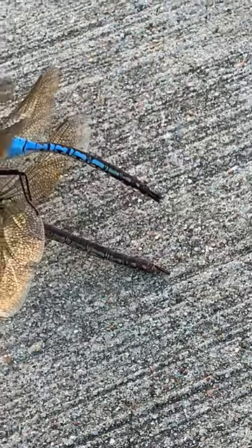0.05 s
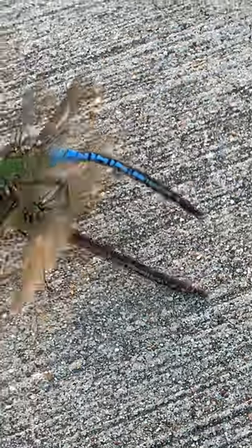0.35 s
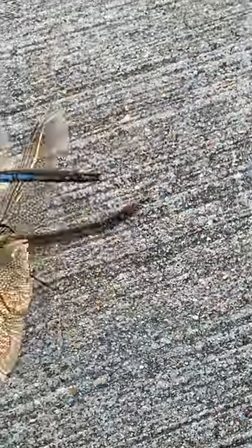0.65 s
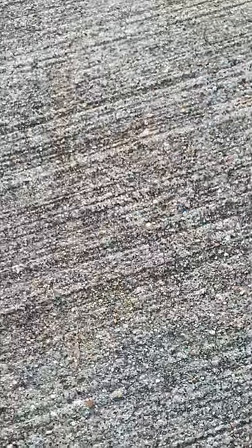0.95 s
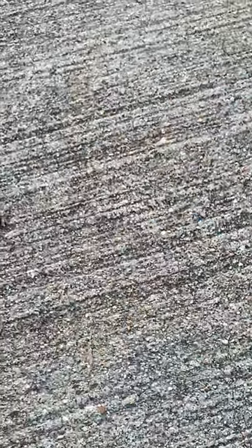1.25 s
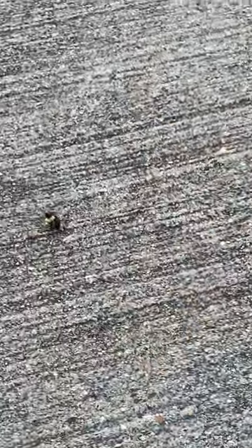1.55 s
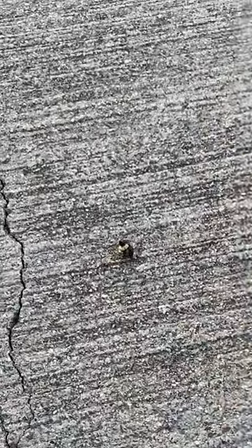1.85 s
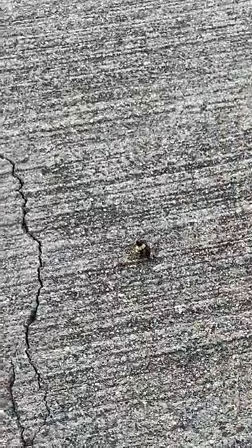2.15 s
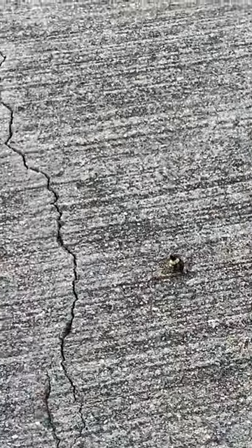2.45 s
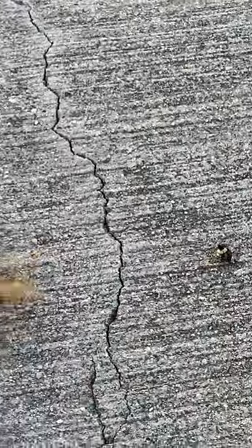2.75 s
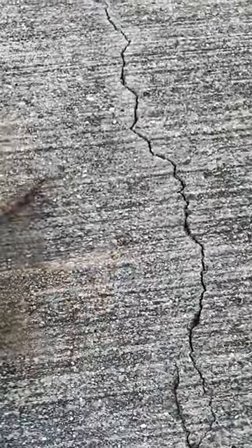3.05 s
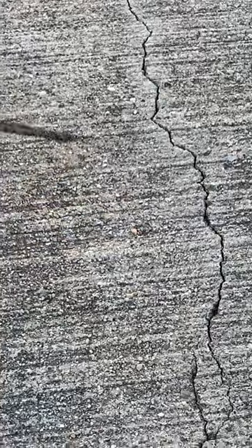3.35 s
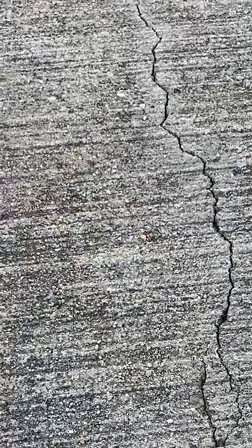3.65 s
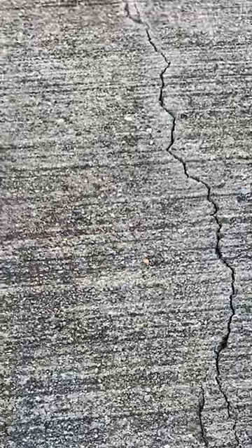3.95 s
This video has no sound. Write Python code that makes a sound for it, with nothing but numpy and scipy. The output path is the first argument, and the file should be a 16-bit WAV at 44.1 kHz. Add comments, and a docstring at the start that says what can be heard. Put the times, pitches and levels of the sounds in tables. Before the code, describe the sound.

Dragonfly wings flutter with a dry, papery rustle and ticks against concrete, over low outdoor rumble.

```python
"""A low outdoor rumble and a hum, then a dry, papery rustle: two tangled dragonflies struggle on
rough concrete, close to a phone's two microphone ports. Their beating wings push the air in a low
flutter, rustle by friction and tick against each other and the ground; their bodies knock on it.
Behind them, distant traffic swells and fades over a faint drone."""
import sys
import numpy as np
from scipy import signal
from scipy.fft import rfft, irfft
from scipy.io import wavfile
from scipy.ndimage import uniform_filter1d

SR = 44100
rng = np.random.default_rng(int(sys.argv[2]) if len(sys.argv) > 2 else 0)


def materialize(psi):
    """Save the field psi as 16-bit PCM at rate SR to the path in sys.argv[1].

    A 1-D psi becomes a single channel; in a 2-D psi each row is a channel.
    """
    bounded = np.clip(np.atleast_2d(psi).T, -1, 1)
    quanta = np.round(bounded * 32767).astype(np.int16)
    wavfile.write(sys.argv[1], SR, quanta)


N = 176400

# wingbeat: (time [s], beat rate [Hz], level of harmonic 1 [dB], of harmonic 2 [dB], of harmonic 3 [dB])
WINGBEAT = [(0, 35.74, -44, -70, -50), (.48, 37, -37, -62, -50), (.62, 41.2, -34, -36.5, -35.5),
            (.8, 43.42, -29.5, -32, -28), (1.1, 46.72, -30, -33, -36.5), (1.38, 49.76, -24.5, -34.5, -45),
            (1.9, 45.7, -33, -34, -34), (2.15, 45.26, -39, -41, -37.5), (2.48, 44.32, -35, -51, -41.5),
            (2.75, 41.54, -27.5, -50, -41), (3.07, 37.13, -30.5, -38, -66), (3.25, 34.23, -41, -47, -42.5),
            (3.47, 31.77, -32, -26.5, -43), (3.65, 31.69, -67, -52, -40.5)]
# spectrum of wing contact: (frequency [Hz], relative level [dB])
WING_SPECTRUM = [(600, -34), (1500, -6.5), (3000, -3), (4600, -0.5), (6500, 3), (8300, 3), (11000, 5.5),
                 (13500, 1.5), (15000, 6), (15700, -1.5), (16400, -30)]
FLEX_BAND_HZ = 1500  # the membranes bend, so colour varies from touch to touch in bands this far apart


def undb(db):
    """Decibels to amplitude ratio."""
    return 10 ** (np.asarray(db) / 20)


def unit(x):
    """Normalisation to rms 1."""
    return x / np.sqrt(np.mean(x ** 2))


def curve(table, column=1):
    """Linear interpolation of one column of a time table, sample by sample."""
    rows = np.array(table, float)
    return np.interp(np.arange(N) / SR, rows[:, 0], rows[:, column])


def response(points):
    """Magnitude response at every bin from (frequency [Hz], level [dB]) points."""
    hz, db = np.array(points, float).T
    bin_hz = np.arange(N // 2 + 1) * SR / N
    return undb(np.interp(np.log(bin_hz + 1), np.log(hz), db))


def colour(x, points):
    """Minimum-phase filtering that keeps the power of white noise."""
    cepstrum = irfft(np.log(unit(response(points))), N)
    cepstrum[1:N // 2] *= 2
    cepstrum[N // 2 + 1:] = 0
    return irfft(rfft(x) * np.exp(rfft(cepstrum)), N)


def drift(rate_hz):
    """Low-pass noise: smooth random motion of rms 1."""
    hold = max(int(SR / rate_hz), 2)
    steps = np.repeat(rng.standard_normal(N // hold + 1), hold)
    return unit(uniform_filter1d(uniform_filter1d(steps, hold), hold)[:N])


def resonance(hz, width_hz):
    """Narrow-band noise: a tone whose amplitude and phase drift."""
    angle = 2 * np.pi * hz * np.arange(N) / SR
    return drift(width_hz) * np.cos(angle) + drift(width_hz) * np.sin(angle)


def distant_noise(spectrum):
    """Partial coherence: far-off noise is alike at both ports in the bass; its mids lean to the right."""
    # incoherent share: (frequency [Hz], side minus mid [dB])
    side_share = [(30, -37), (120, -24), (600, -13), (1400, -9), (3000, -2), (6000, -12)]
    # balance of the ports: (frequency [Hz], left minus right [dB])
    balance = [(50, 0), (260, -2), (550, -4.5), (850, -5), (1300, -1), (2500, 0)]
    mid, side = (rfft(colour(rng.standard_normal(N), spectrum)) for _ in range(2))
    width, sign = response(side_share), np.array([[1], [-1]])
    pair = (mid + sign * width * side) / np.sqrt(1 + width ** 2)
    return irfft(pair * response(balance) ** (sign / 2), N)


def outdoors():
    """Superposition of independent sources: rumble, traffic, droning resonances and a wavering hum."""
    # spectra of the broadband noises: (frequency [Hz], relative level [dB])
    rumble_spectrum = [(35, -4), (55, 4.5), (100, -1), (190, -3.5), (310, -7.5), (400, -13.5), (520, -18),
                       (680, -25), (1500, -31), (3000, -35.5), (5200, -46), (5900, -38), (7500, -53.5),
                       (15000, -56)]
    traffic_spectrum = [(200, -13.5), (400, 5.5), (700, 1), (950, 4), (1400, -2.5), (2000, -6),
                        (3000, -16.5), (5000, -19), (10000, -67)]
    # resonances of the drone: (frequency [Hz], width [Hz], relative level [dB])
    drone_modes = [(241.7, 24, -42.5), (270.7, 16, -45), (358.6, 14, -50.5), (439.6, 20, -51)]
    # envelopes of the four sources: (time [s], level [dB])
    hum_envelope = [(0, -40), (.6, -44.5), (1.3, -31.5), (1.9, -36.5), (2.8, -39.5), (3.15, -32),
                    (3.5, -38.5), (3.7, -54)]
    rumble_envelope = [(0, -31), (.8, -30), (1.6, -30), (2.5, -32), (3.2, -30), (3.65, -32.5), (3.85, -31)]
    traffic_envelope = [(0, -52), (.5, -46.5), (1.0, -44), (1.5, -43), (1.9, -43), (2.3, -45.5), (2.7, -52),
                        (3.3, -60)]
    drone_envelope = [(.9, -2.5), (1.7, 3.5), (2.7, -1.5), (2.95, 4), (3.15, -5), (3.5, 4), (3.7, -2),
                      (3.85, 5.5)]
    hum_hz = 75.24 * (1 + .01 * drift(8.04))
    hum = np.sqrt(2) * np.sin(2 * np.pi * np.cumsum(hum_hz) / SR)
    rumble = distant_noise(rumble_spectrum) * undb(curve(rumble_envelope) + drift(9.356))
    traffic = distant_noise(traffic_spectrum) * undb(curve(traffic_envelope) + .5 * drift(7.76))
    drone = sum(undb(db) * resonance(hz, width) for hz, width, db in drone_modes)
    drone = drone * undb(curve(drone_envelope) + np.array([[-1], [1]]))  # louder on the right
    return rumble + traffic + drone + hum * undb(curve(hum_envelope) + 1.7 * drift(5.93))


def body_knocks():
    """Damped free vibration: a body bumps the concrete and rings, tuned a little differently each time."""
    # bumps: (time [s], level [dB])
    bumps = [(.452, -31.5), (.791, -40), (.836, -41), (.948, -40), (1.0205, -37), (1.124, -37),
             (2.9875, -37), (3.422, -34), (3.541, -39), (3.72, -40)]
    # modes of a knock: (frequency [Hz], relative level [dB])
    modes = [(1150, -2), (1550, 0), (2150, 0), (2900, -2)]
    t60_s, detune = .012, .05
    out = np.zeros(N)
    t = np.arange(SR // 20) / SR
    hz, mode_db = np.array(modes, float).T
    amplitudes = undb(mode_db) * (-1) ** np.arange(len(hz))
    decay = np.exp(-np.log(1000) * t / t60_s)
    for start, db in bumps:
        tuned_hz = hz * (1 + detune * rng.standard_normal(len(hz)))
        ring = amplitudes @ np.sin(2 * np.pi * np.outer(tuned_hz, t))
        i = int(start * SR)
        out[i:i + len(t)] += (undb(db) * ring * decay)[:N - i]
    return out


def wing_flutter(phase):
    """Periodic displacement of air: the beating wings radiate three low harmonics that waver."""
    out = np.zeros(N)
    for k in (1, 2, 3):
        level_db = curve(WINGBEAT, column=k + 1) + .73 * drift(12)
        out += np.sqrt(2) * undb(level_db) * np.sin(k * phase + .18 * drift(5.47))
    return out


def vein_catches():
    """Shot noise: wing veins catch in dense tiny ticks, each in its own band, a few much larger."""
    ticks_per_band_per_s, spread_db = 1500, 3
    hz, spectrum = np.arange(N // 2 + 1) * SR / N, 0
    for centre in np.arange(FLEX_BAND_HZ, SR / 2, FLEX_BAND_HZ):
        catches = rng.random(N) < ticks_per_band_per_s / SR
        size = undb(spread_db * np.minimum(rng.exponential(size=N), 5))
        band = np.sqrt(np.maximum(1 - abs(hz - centre) / FLEX_BAND_HZ, 0))
        spectrum = spectrum + band * rfft(catches * size * rng.choice([-1, 1], N))
    return unit(irfft(spectrum, N))


def wing_rubbing(phase):
    """Sliding friction: the wings rub in one flick per up or down stroke, with a resonant scrape."""
    # envelopes of the rustle and the resonant scrape: (time [s], relative level [dB])
    rustle_envelope = [(.332, -77), (.343, -50), (.41, -45.5), (.435, -56), (.49, -50.5), (.55, -46.5),
                       (.595, -57), (.625, -46.5), (.64, -72), (.70, -65), (.715, -54), (.78, -51),
                       (.82, -53.5), (.87, -47.5), (.93, -48), (.96, -39.5), (1.0, -54), (1.05, -46.5),
                       (1.11, -53.5), (1.23, -51.5), (1.35, -72), (1.67, -68), (1.71, -57), (1.795, -53.5),
                       (1.818, -39.5), (1.85, -52), (2.0, -47), (2.13, -52.5), (2.31, -45.5), (2.36, -53),
                       (2.555, -60.5), (2.58, -48), (2.84, -56), (2.91, -40), (2.96, -45.5), (3.14, -46),
                       (3.21, -50), (3.33, -46.5), (3.44, -49), (3.49, -51.5), (3.68, -52), (3.9, -49.5),
                       (4.0, -59)]
    scrape_envelope = [(2.7, -85), (2.9, -59), (3.2, -55.5), (3.42, -60), (3.55, -85)]
    # sliding between flicks, strong while the wings press together: (time [s], relative level [dB])
    slide_envelope = [(1.05, 0), (1.8, -12)]
    scatter_db, upstroke_db, rustle_gain_db = 3.2, -4, 5.5
    rise, fall = .08, .32  # shares of a stroke
    strokes = phase / np.pi + .2 * drift(40)
    stroke, progress = np.floor(strokes).astype(int), strokes % 1
    scatter = np.clip(rng.standard_normal(N), -2, 1)[stroke]
    force = undb(scatter_db * scatter + upstroke_db * (stroke % 2))
    flick = np.minimum(progress / rise, 1) * np.exp(-progress / fall)
    friction = unit(force * flick + undb(curve(slide_envelope)) * np.sqrt(force) / 2)
    rustle = vein_catches() * friction * undb(curve(rustle_envelope) + rustle_gain_db)
    scrape = resonance(hz=3870, width_hz=650) * np.sqrt(friction) * undb(curve(scrape_envelope))
    return colour(rustle, WING_SPECTRUM) + scrape


def membrane_burst(envelope, length_s, tilt_db_per_octave):
    """Spectral shaping: a bending membrane tints each noise burst anew; energy is set by the length."""
    pivot_hz, flex_db = 11000, 3
    n = len(envelope)
    bands = np.arange(0, SR / 2, FLEX_BAND_HZ)
    octaves = np.log2(np.clip(bands, FLEX_BAND_HZ, pivot_hz) / pivot_hz)
    band_db = flex_db * rng.standard_normal(len(bands)) + tilt_db_per_octave * octaves
    tint = undb(np.interp(np.arange(n // 2 + 1) * SR / n, bands, band_db))
    burst = envelope * irfft(rfft(rng.standard_normal(n)) * tint, n)
    return burst * np.sqrt(length_s * SR / np.sum(burst ** 2))


def wing_strikes():
    """Impact excitation: a rasp, then a faint shiver; harder hits are brighter, shorter ones snap more."""
    # wing hits: (time [s], relative level [dB], length [s])
    hits = [(.3412, -34, .007), (.362, -33, .0113), (.4517, -24, .002), (.4917, -33, .003),
            (.6101, -30, .002), (.6242, -31, .0033), (.7617, -32, .0028), (.7882, -30, .0074),
            (.8325, -29, .009), (.8571, -33, .0046), (.8758, -32, .0029), (.9143, -32, .0016),
            (.946, -30.5, .005), (1.0195, -16, .0022), (1.0792, -28, .0033), (1.122, -24, .005),
            (1.144, -27, .0028), (1.1883, -33, .0022), (1.6988, -33, .003), (1.8063, -36, .012),
            (1.8969, -38, .0043), (1.9249, -37, .0046), (1.9874, -37, .0039), (2.018, -33, .0026),
            (2.0705, -38, .002), (2.0836, -34, .0034), (2.2494, -38, .012), (2.3055, -35, .0016),
            (2.3295, -37, .003), (2.3915, -37, .0026), (2.701, -39, .006), (2.722, -39, .003),
            (2.7425, -37, .0032), (2.7945, -36, .003), (2.8685, -34, .0044), (2.8955, -32, .0038),
            (2.9355, -30, .002), (2.9629, -30, .0023), (2.9873, -25, .0035), (3.0305, -35, .003),
            (3.0505, -29, .002), (3.0773, -32.5, .0028), (3.1177, -32, .003), (3.1327, -31, .002),
            (3.1475, -35, .002), (3.2468, -30, .0023), (3.2863, -34, .0036), (3.3034, -31, .002),
            (3.402, -32, .002), (3.4214, -29, .0037), (3.4555, -38, .003), (3.5176, -28, .0039),
            (3.5403, -28, .0022), (3.6328, -37, .003), (3.6559, -35, .0036), (3.7039, -34, .0044),
            (3.7193, -30, .0033), (3.7313, -34, .0042), (3.7608, -33, .0035), (3.791, -34, .0029),
            (3.9115, -38, .003)]
    attack_s, shiver_s, shiver_db = .0006, .005, -18
    rasp_db, bright_above_db = -.8, -30
    snap_db, reference_length_s = 12.5, .0017
    out = np.zeros(N)
    t = np.arange(SR // 20) / SR
    shiver = undb(shiver_db) * np.exp(-t / shiver_s)
    for start, db, length in hits:
        fade = np.exp(-np.maximum(t - .6 * length, 0) / (.35 * length))  # hold, then release
        envelope = np.minimum(t / attack_s, 1) * np.maximum(fade, shiver)
        rasp = membrane_burst(envelope, length, tilt_db_per_octave=.55 * max(db - bright_above_db, 0))
        i = int(start * SR)
        out[i:i + len(t)] += undb(db + rasp_db) * rasp[:N - i]
        out[i + int(attack_s * SR)] += undb(db + snap_db) * reference_length_s / length
    return colour(out, WING_SPECTRUM)


def port_delay(pair):
    """Arrival-time difference: the treble reaches the right port a fraction of a millisecond late."""
    # lag of the right port: (frequency [Hz], phase [rad])
    phase_lag = [(0, 0), (1400, 0), (3300, .8), (4900, 3.14), (6500, 5.8), (7400, 6.6), (9050, 9.42),
                 (15300, 18.8), (17000, 19)]
    hz, lag = np.array(phase_lag).T
    shift = np.exp(-1j * np.interp(np.arange(N // 2 + 1) * SR / N, hz, lag))
    return np.array([pair[0], irfft(rfft(pair[1]) * shift, N)])


def scene():
    """Common excitation: one wingbeat drives both flutter and rustle, in front of the outdoor noise."""
    phase = 2 * np.pi * np.cumsum(curve(WINGBEAT)) / SR
    turn_db = 1.8  # as the wings turn, each port catches them a little differently
    turning = undb(turn_db * drift(200) * np.array([[1], [-1]]))
    flutter = wing_flutter(phase)
    contacts = wing_rubbing(phase) + wing_strikes() + body_knocks()
    return port_delay(flutter + turning * contacts + outdoors())


def record(dry):
    """Band limiting: the phone's steep low-pass filter cuts the top of the treble."""
    cutoff_hz = 16400
    return signal.sosfilt(signal.ellip(10, .2, 80, cutoff_hz, fs=SR, output="sos"), dry)


dry = scene()
out = record(dry)
materialize(out)
```